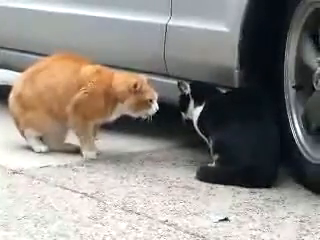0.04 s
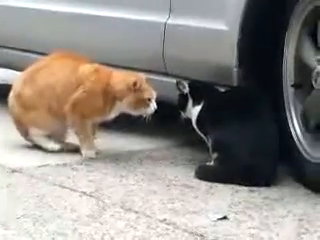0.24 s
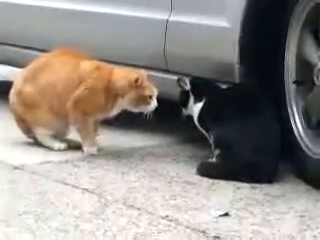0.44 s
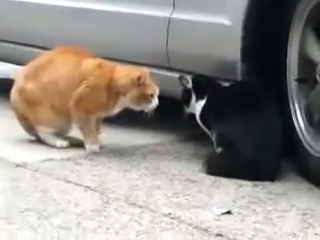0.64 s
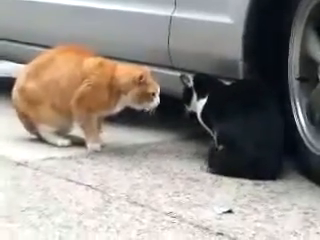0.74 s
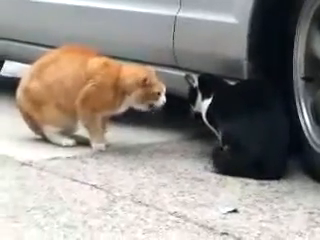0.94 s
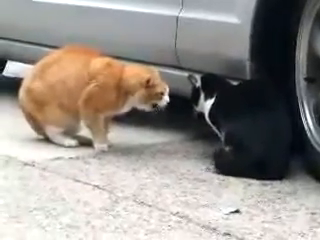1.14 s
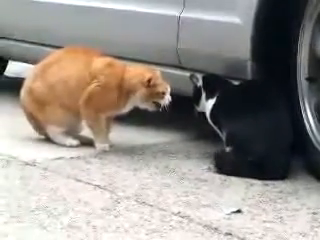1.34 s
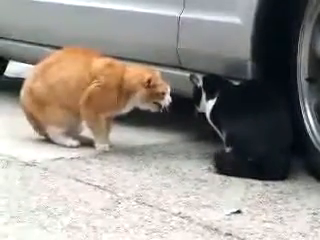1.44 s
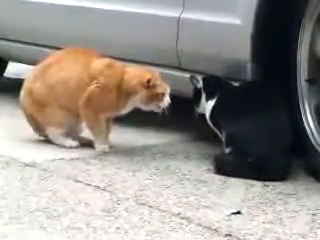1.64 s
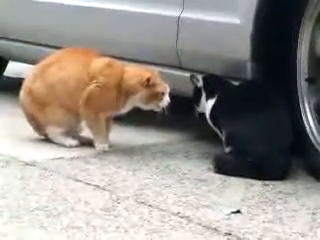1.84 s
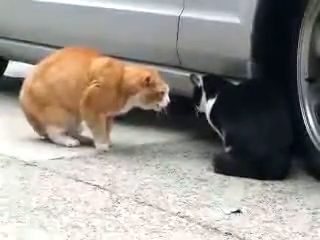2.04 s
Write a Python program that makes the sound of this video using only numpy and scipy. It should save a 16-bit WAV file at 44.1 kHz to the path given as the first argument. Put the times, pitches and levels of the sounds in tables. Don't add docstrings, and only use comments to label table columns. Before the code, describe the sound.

A cat yowls at another: one yowl fades, a pause, then a hoarse, climbing, cracking wail outdoors.

```python
import sys
import numpy as np
from scipy import signal
from scipy.io import wavfile

SR = 44100
rng = np.random.default_rng(int(sys.argv[2]) if len(sys.argv) > 2 else 0)


def dump_mix(stems):
    frames = np.atleast_2d(stems).T
    limited = np.clip(frames, -1, 1)
    pcm = np.round(limited * 32767).astype(np.int16)
    wavfile.write(sys.argv[1], SR, pcm)


def voltage_ratio(level):
    return 10 ** (np.asarray(level, float) / 20)


N = 91948


def rms_one(x):
    return x / np.sqrt(np.mean(x ** 2) + 1e-20)


def in_time(rows):
    s, *columns = np.transpose(rows)
    return [np.interp(np.arange(N) / SR, s, column) for column in columns]


def drift(rate):
    pole = np.exp(-80 * np.pi * rate / SR)
    noise = rng.standard_normal(N // 40 + 1002)
    slow = signal.lfilter([1], [1, -2 * pole, pole * pole], noise)[1000:]
    return np.interp(np.arange(N) / 40, np.arange(len(slow)), rms_one(slow))


def band(x, low_hz, high_hz):
    return signal.sosfilt(signal.butter(2, [low_hz, high_hz], "band", fs=SR, output="sos"), x)


# t/s, pitch f/Hz, level/dB
YODEL = [(0, 335, -21), (.02, 343, -19), (.035, 353, -11), (.042, 357, -16), (.047, 402, -18),
         (.056, 428, -18), (.07, 413, -20), (.077, 385, -17), (.088, 367, -19)]
FADE = [(0.103, 364.6, -21.5), (0.142, 365.2, -24.5), (.165, 355, -14.5), (.21, 348.8, -15.5),
        (.23, 343.7, -25), (0.269, 339.8, -25), (.305, 329.7, -26.5), (.335, 309, -30.5),
        (.402, 251.8, -28.5)]
RASP = [
    (.982, 270.8, -23),
    (1.031, 270.7, -17),
    (1.055, 262.2, -12),
    (1.085, 324, -11),
    (1.106, 375, -11.5),
    (1.129, 414.9, -13.5),
]
HOLD = [(1.159, 431.3, -12.5), (1.21, 467.9, -15.5), (1.28, 475.8, -17.5), (1.358, 494.5, -16.5),
        (1.412, 503.5, -17), (1.522, 520, -16), (1.579, 513.5, -19), (1.636, 492, -16.5)]
BREAK = [
    (1.643, 490, -19),
    (1.655, 488, -10),
    (1.668, 496, -17),
    (1.68, 506, -15),
    (1.694, 520, -18),
    (1.708, 549, -18),
    (1.734, 552, -20),
    (1.741, 532, -20),
]
SAG = [(1.745, 467, -20), (1.819, 451.8, -23.5), (1.855, 429.1, -21.5), (1.901, 420, -24.5),
       (1.954, 403, -18), (2.014, 391.8, -19), (2.023, 383.6, -16.5), (2.045, 393.7, -17.5),
       (2.085, 394.4, -17.5)]


def folds():
    release_s = 0.014
    silence = [(FADE[-1][0] + release_s, FADE[-1][1], -70), (RASP[0][0] - release_s, RASP[0][1], -70)]
    return in_time(YODEL + FADE + silence + RASP + HOLD + BREAK + SAG)


def tremble():
    middle_s, half_length_s, per_s = 1.55, .17, 39
    t = np.arange(N) / SR
    swell = np.exp(-((t - middle_s) / half_length_s) ** 4)
    return swell * np.sin(2 * np.pi * per_s * t + drift(12))


WIDTHS_HZ = (341, 255, 188)


def throat(hz, first, second, third, second_db, third_db):
    valley_db, chest_db, low_cut_hz = -36.5, -11.5, 745
    air_db, air_hz, air_width_hz = -4.5, 5100, 730

    def hump(centre, width):
        return 1 / (1 + ((hz - centre) / width) ** 2) ** 2

    low = hump(first, WIDTHS_HZ[0] * first / 1400) + voltage_ratio(chest_db) / (1 + (hz / first) ** 8)
    middle = hump(second, WIDTHS_HZ[1] * (second / 2200) ** 2)
    top = hump(third, WIDTHS_HZ[2]) + voltage_ratio(air_db) * hump(air_hz, air_width_hz)
    total = low + voltage_ratio(second_db) * middle + voltage_ratio(third_db) * top + voltage_ratio(valley_db)
    return total / (1 + (low_cut_hz / hz) ** 6)


# t/s, first resonance f/Hz, second f/Hz, third f/Hz
MOUTH = [(0, 980, 1920, 4160), (.06, 962, 2040, 3860), (.18, 1022, 2130, 3950), (.3, 740, 1980, 4085),
         (.42, 817, 1990, 3750), (1.05, 1018, 2039, 3795), (1.09, 1240, 2210, 4210),
         (1.14, 1533, 2630, 5280), (1.19, 1794, 2910, 4040), (1.3, 1836, 3130, 4180),
         (1.39, 2003, 3240, 4069), (1.55, 1960, 3257, 3937), (1.61, 1614, 3225, 5140),
         (1.655, 1459, 3400, 5220), (1.72, 1177, 3250, 5100), (1.76, 1360, 2823, 4983),
         (1.86, 1021, 2330, 4365), (2.085, 1014, 2750, 4500)]
# t/s, second resonance level/dB, third level/dB, roughness [0-1]
STRAIN = [(.05, -17, -25, .08), (.12, -10, -14.5, 0.11), (.19, -24, -31, 0.1), (.3, -19.5, -18.5, .05),
          (.41, -15, -14, 0.11), (.98, -22, -21, .85), (1.05, -11.5, -22.5, .45), (1.09, -23, -21, 0.35),
          (1.15, -15.5, -22, 0.25), (1.25, -8, -8.5, 0.09), (1.42, -1.5, -13, 0.13), (1.58, -0.5, -7, .05),
          (1.65, -15.5, -12, 0.25), (1.695, -16, -25.5, 0.32), (1.71, -12, -3.5, 0.11),
          (1.745, -11.5, -15, 0.2), (1.9, -18.5, -23.5, 0.2), (2.085, -36.5, -31.5, 0.1)]


def cat():
    jitter, rasp_jitter, tremor_pitch = .0025, .03, .003
    rasp_db, breath_db, tremor_db = -7, -22.5, 1.8
    waver_db, waver_per_s = 2.6, 26
    pitch, level_db = folds()
    second_db, third_db, rough = in_time(STRAIN)
    shape = in_time(MOUTH) + [second_db, third_db]
    rough = np.clip(rough, 0, 1)
    tremor = tremble()
    level_db = level_db + tremor_db * tremor
    unsteady = tremor_pitch * tremor + jitter * drift(40) + rasp_jitter * rough ** 2 * drift(120)
    pitch = pitch * (1 + unsteady)
    phase = 2 * np.pi * np.cumsum(pitch) / SR
    out, power, flutter = np.zeros(N), 1e-9, drift(60)
    for k in range(1, 25):
        gain = throat(k * pitch, *shape) * (k * pitch < 6500)
        waver = voltage_ratio(waver_db * min(k / 6, 1.2) * drift(waver_per_s))
        rasp = voltage_ratio(rasp_db) * rough * (drift(210) + flutter)
        breath = voltage_ratio(breath_db) * drift(330)
        out += gain * waver * (1 - rough / 2 + rasp + breath) * np.sin(k * phase + .4 * k * k)
        power = power + gain ** 2 / 2
    return voltage_ratio(level_db) * out / np.sqrt(power)


# delay t/s, level/dB
ECHOES = [(.0031, -13), (.0074, -13), (.0127, -12), (.019, -17), (.027, -22)]


def echoes(x):
    out = x.copy()
    for delay, db in ECHOES:
        lag = int(delay * SR)
        out[lag:] += voltage_ratio(db) * x[:-lag]
    return out * voltage_ratio(-0.14)


# middle t/s, half length t/s, level/dB
GROWLS = [
    (0.593, .09, -26.5),
    (1.86, 0.2, -32.5),
]


def growl():
    pulse_hz, jitter, chest_band_hz = 143, .05, (270, 520)
    t = np.arange(N) / SR
    cycles = np.cumsum(pulse_hz * (1 + jitter * drift(24.5))) / SR
    pulses = np.diff(np.floor(cycles), prepend=0) * voltage_ratio(drift(80))
    swell = sum(voltage_ratio(db) * np.exp(-((t - s) / half) ** 2) for s, half, db in GROWLS)
    return swell * rms_one(band(pulses + 1e-18, *chest_band_hz))


def spit():
    start_s, attack_s, decay_s = 1, 0.0026, 0.099
    band_hz, level_db = (3200, 7500), -35
    since = np.arange(N) / SR - start_s
    shape = np.clip(since / attack_s, 0, 1) * np.exp(-np.maximum(since, 0) / decay_s)
    return voltage_ratio(level_db) * shape * rms_one(band(rng.standard_normal(N), *band_hz))


# f/Hz, level/dB
STREET = [(25, -30), (40, 2), (75, -8), (667, -10.5), (1310, -15.5), (2570, -31), (3770, -30.5),
          (5400, -36), (7000, -37)]


def traffic():
    level_db, patchy_db, rumble_cut_hz = -25, 0.22, 44.7
    edges = 24 * 2 ** np.arange(0, 8.6, .5)
    white = rng.standard_normal((2, N + SR))
    hz, db = np.transpose(STREET)
    out = 0
    for k, (low, high) in enumerate(zip(edges, edges[1:])):
        colour = np.interp(np.log(low * high) / 2, np.log(hz), db)
        patch = voltage_ratio(colour + patchy_db * drift(2.7))
        out = out + patch * band(white[k % 2], low, high)[SR:]
    rumble_cut = signal.butter(4, rumble_cut_hz, "high", fs=SR, output="sos")
    return signal.sosfilt(rumble_cut, voltage_ratio(level_db) * rms_one(out))


# f/Hz, wander f/Hz, level/dB
IDLE = [
    (46.5, 2.74, -28.5),
    (111, 6.95, -32.5),
]


def engine():
    out = 0
    for centre_hz, width_hz, level_db in IDLE:
        phase = 2 * np.pi * np.cumsum(centre_hz + width_hz * drift(3)) / SR
        out = out + voltage_ratio(level_db - 1 + 0.5 * drift(12)) * np.sin(phase)
    return out


# t/s, level/dB
GAIN_RIDE = [
    (0, 0),
    (.4, 0),
    (1.1, 1.5),
    (1.35, -4),
    (1.7, -5.5),
    (2.085, -1.5),
]


def scene():
    ride, = in_time(GAIN_RIDE)
    return (echoes(cat()) + growl() + spit() + voltage_ratio(ride) * (traffic() + engine()))[None]


def top_cut(x):
    return signal.sosfilt(signal.butter(12, 16000, fs=SR, output="sos"), x)


def record(dry):
    clip, slowdown, offset = 1.3, 4, -.0045
    input_cut_hz, output_cut_hz, top_hz = 6990, 5285, 7610
    splice_s, splice_db = 2.02102, -27

    def low(x, hz):
        return signal.sosfiltfilt(signal.butter(5, hz, fs=SR, output="sos"), x)

    rounded = clip * np.tanh(dry / clip)
    sampled = np.arange(N) % slowdown == 0
    held = low(rounded, input_cut_hz) * sampled * slowdown
    x = low(held, output_cut_hz)
    x = signal.sosfiltfilt(signal.cheby2(10, 35, top_hz, fs=SR, output="sos"), x)
    x[:, int(splice_s * SR)] -= voltage_ratio(splice_db)
    return top_cut(x + offset)


dry = scene()
out = record(dry)
dump_mix(out)
```